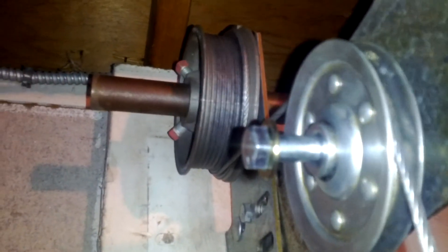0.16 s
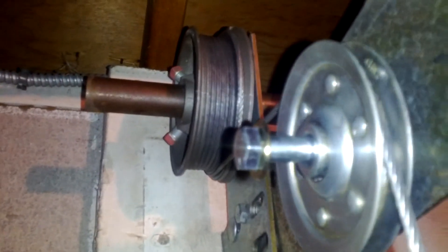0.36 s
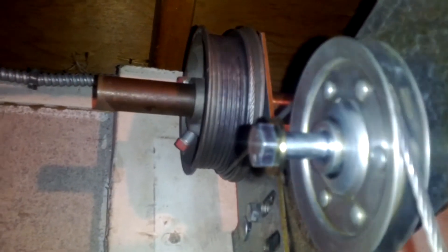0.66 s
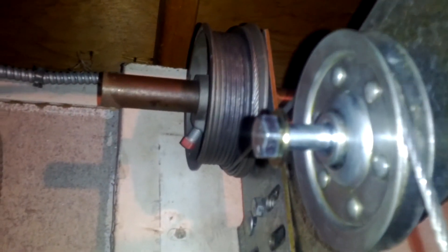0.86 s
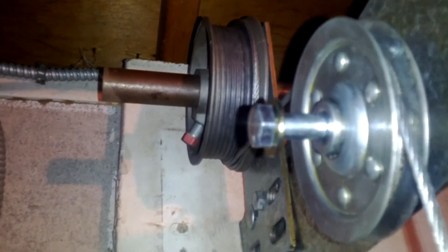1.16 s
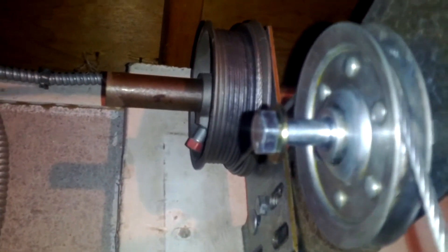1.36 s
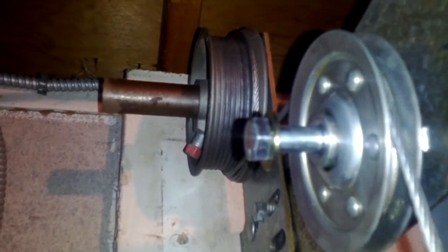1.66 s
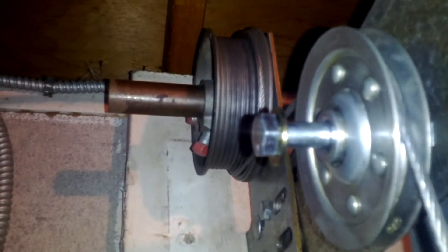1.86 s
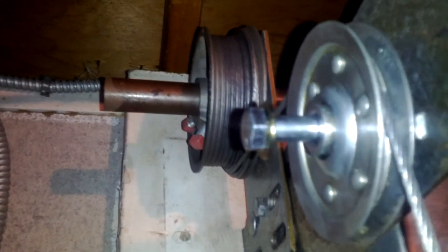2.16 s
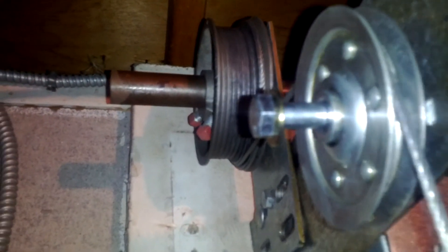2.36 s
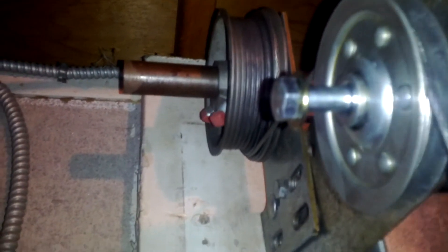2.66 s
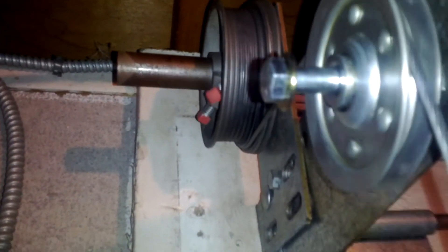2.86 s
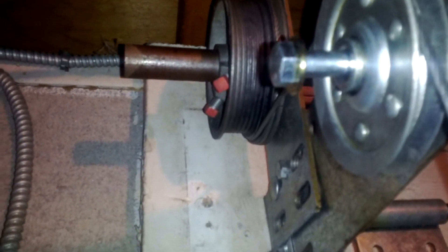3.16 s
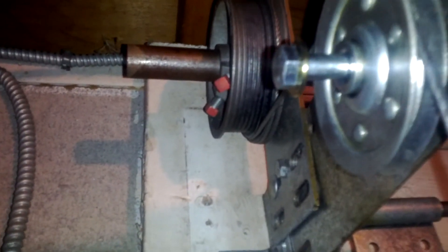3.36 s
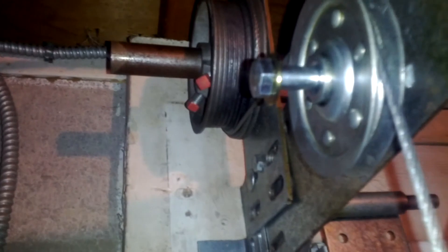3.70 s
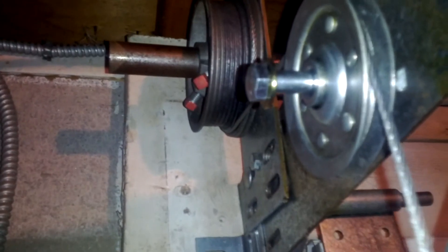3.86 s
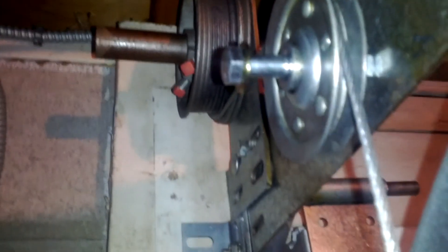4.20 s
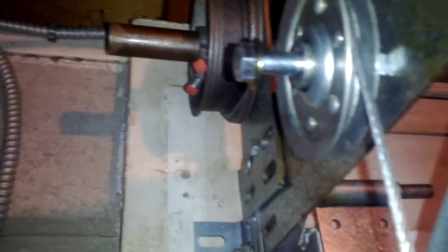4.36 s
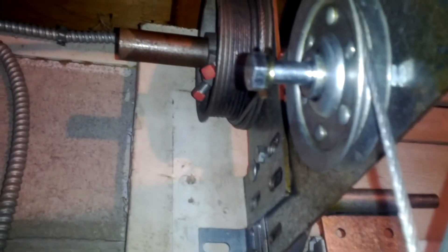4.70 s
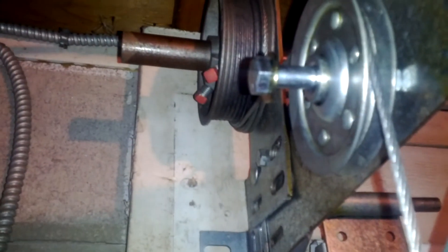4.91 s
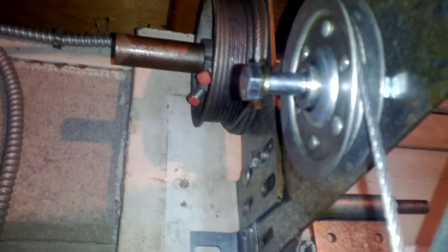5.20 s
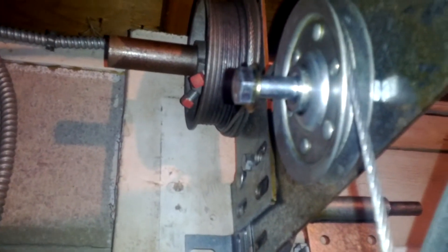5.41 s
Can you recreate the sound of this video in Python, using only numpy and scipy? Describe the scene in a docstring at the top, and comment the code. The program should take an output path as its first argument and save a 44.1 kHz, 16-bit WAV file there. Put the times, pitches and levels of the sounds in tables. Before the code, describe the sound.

Close up, a garage door rolls quietly with sharp spaced ticks, then knocks, shrieks and crashes with a metallic rattle, settling into scuffs and hiss.

```python
"""A sectional garage door rolls on its track, heard from close beside the cable drum and pulley.
Rollers, cable and panels rumble as coloured noise; the lift gear ticks nearby, ringing the pulley's modes.
Rollers knock in the track, steel gives one shrill ring, and the door crashes and rattles: struck modes
and noise that dies away in the garage, overloading the microphone. At the end the cable scuffs
over the drum and the slowing pulley rubs dryly, over the quiet air of the garage."""
import sys
import numpy as np
from scipy import signal
from scipy.fft import rfft, irfft
from scipy.io import wavfile

SR = 44100
rng = np.random.default_rng(int(sys.argv[2]) if len(sys.argv) > 2 else 0)


def to_wav(s):
    """Save 16-bit WAV."""
    ch = np.atleast_2d(s).T  # columns
    pcm = np.round(np.clip(ch, -1, 1) * 32767)  # PCM
    wavfile.write(sys.argv[1], SR, pcm.astype(np.int16))


N = 244314
T = np.arange(65536) / SR  # time within one hit [s]

# rollers knocking in the track:
# (time [s], relative ring level [dB], crack level [dB], treble tilt of the ring [dB/octave], rise [s])
KNOCK_HITS = [(2.094, -38, -42, -1, 0.0025), (2.146, -30.5, -55, -4.5, 0.006),
              (2.3463, -24, -38.5, -5.5, 0.0019), (2.3618, -12, -2, -1, 0.00044),
              (2.632, -31, -48, -2, 0.011), (2.8905, -20, -16.5, -2, 0.00067), (3.1, -24, -28, -1, 0.0005),
              (3.1225, -37.5, -26.5, -8, 0.00073)]
# blows on the door:
# (time [s], panel clatter level [dB], hardware jingle level [dB], panel boom level [dB], rise [s])
DOOR_BLOWS = [(2.696, -19, -20, -21.5, 0.0042), (2.905, -22, -17.5, -22.5, 0.0055),
              (2.94, -22.5, -15, -32, 0.0083), (2.961, -11, -3, -27.5, 0.0054)]
# colour of the swaying panels: (frequency [Hz], relative level [dB])
SWAY_COLOUR = [(10, -20.5), (40, 0), (65, -2.5), (110, -1.5), (150, -2), (210, -10.5), (265, -10.5),
               (350, -15.5), (700, -36), (3000, -64.5)]
# colour of the rollers in the track, and of faint air: (frequency [Hz], relative level [dB])
ROLL_COLOUR = [(30, -17), (150, 9), (350, -4), (560, 0), (1000, 0.5), (1600, -3.5), (2400, -13),
               (4000, -18.5), (6000, -14), (9000, -25.5), (16000, -37.5)]
# colour of the cable's hiss, and of the background hiss: (frequency [Hz], relative level [dB])
HISS_COLOUR = [(100, -1.5), (600, 0.5), (2000, -8.5), (4000, -8), (7500, -6), (9500, -3.5), (11500, 1),
               (13000, -3), (15500, -11.5)]
# colour of the door's heaving weight, and of the deepest rumble: (frequency [Hz], relative level [dB])
HEAVE_COLOUR = [(8, -9.5), (22, 3.5), (45, -0.5), (65, -1.5), (85, -15.5), (200, -38.5), (800, -80)]


def amp(db):
    """Decibels to gain."""
    return 10 ** (np.asarray(db) / 20)


def unit(x):
    """Scales to rms 1."""
    return x / np.sqrt(np.mean(x ** 2) + 1e-20)


def add(mix, s, sound):
    """Mixes a sound in at a time in seconds, cut off where the scene ends."""
    part = mix[round(s * SR):][:len(sound)]
    part += sound[:len(part)]


def read(points, hz):
    """Reads a table on a log-frequency axis."""
    f, value = np.transpose(points)
    return np.interp(np.log(hz + 1), np.log(f + 1), value)


def noise(hue, size, tilt_db=0):
    """Noise of a given colour and rms 1, tilted above 1 kHz in dB per octave."""
    hz = np.fft.rfftfreq(size, 1 / SR)
    octaves = np.log2(np.maximum(hz, 1000) / 1000)
    gain = amp(read(hue, hz) + tilt_db * octaves)
    return unit(irfft(rfft(rng.standard_normal(size)) * gain, size))


def fade(t60):
    """Exponential decay by 60 dB in t60 seconds."""
    return np.exp(-np.log(1000) * T / t60)


def onset(rise):
    """The straight build-up of a contact over its rise in seconds."""
    return np.minimum(T / max(rise, 1 / SR), 1)


def swell(start, rise, t60):
    """An envelope over the whole scene: builds from its start while already dying away."""
    age = np.maximum(np.arange(N) / SR - start, 0)
    return np.minimum(age / rise, 1) * np.exp(-np.log(1000) * age / t60)


def wander(size, per_s):
    """Random drift: normal draws at a rate per second, joined by straight lines."""
    t = np.arange(size) / SR
    return np.interp(t * per_s, np.arange(4096), rng.standard_normal(4096))


def ring(modes, tilt_db=0):
    """The clear modes of a struck part: decaying sines of random phase, tilted above 1 kHz."""
    total = np.zeros(len(T))
    for hz, db, t60 in modes:
        tilt = tilt_db * np.log2(max(hz / 1000, 1))
        total += amp(db + tilt) * fade(t60) * np.sin(2 * np.pi * (hz * T + rng.random()))
    return total


def cluster(bands):
    """Many close modes ringing together: steady noise of rms 1 gathered in a few bands."""
    hz = np.fft.rfftfreq(N, 1 / SR)
    gain = sum(amp(db) / (1 + (2 * (hz - centre) / width) ** 4) ** .5 for centre, width, db in bands)
    return unit(irfft(rfft(rng.standard_normal(N)) * gain, N))


def reverberate(x, stretch):
    """Lets each band of a dense sound die away as in the garage, its decay times scaled by stretch."""
    # decay of the garage: (frequency [Hz], t60 before stretching [s])
    garage_decay = [(60, 0.43), (300, .7), (700, 0.79), (1400, 0.59), (3000, 0.5), (5500, 0.47),
                    (8000, 0.28), (11000, 0.55), (15000, .19)]
    hz, spectrum = np.fft.rfftfreq(len(T), 1 / SR), rfft(x)
    centres, t60s = np.transpose(garage_decay)
    shares = [read(np.c_[centres, band], hz) for band in np.eye(len(centres))]
    return sum(irfft(spectrum * share) * fade(t60 * stretch) for share, t60 in zip(shares, t60s))


def quiet():
    """Steady background of the garage: coloured noises for faint air, hiss and low rumble."""
    layers = ((ROLL_COLOUR, -71), (HISS_COLOUR, -64), (SWAY_COLOUR, -59), (HEAVE_COLOUR, -59.5))  # dB
    return sum(amp(db) * noise(hue, N) for hue, db in layers)


def rolling():
    """One effort drives the rollers in the track, the cable's hiss over the pulley and the panels' rumble."""
    # how hard the door rolls: (time [s], level [dB])
    effort_points = [(0.0, -60), (0.25, -60), (0.78, -53), (0.91, -60.5), (1.2, -59.5), (2.05, -53)]
    coast_db_per_s = 15  # after the last point the door runs down
    t = np.arange(N) / SR
    s, level_db = np.transpose(effort_points)
    coast_db = coast_db_per_s * np.maximum(t - s[-1], 0)
    effort = amp(np.interp(t, s, level_db) - coast_db)
    # each layer in dB relative to the effort
    rollers = noise(ROLL_COLOUR, N) * amp(2.5 + .8 * wander(N, per_s=20))
    cable = noise(HISS_COLOUR, N) * amp(-1 + .6 * wander(N, per_s=390))
    panels = noise(SWAY_COLOUR, N) * amp(-3.5)
    return effort * (rollers + cable + panels)


def bump(db, hz, width, t60):
    """A roller rides over a rough spot and a panel hums briefly in a narrow band of modes."""
    hum = cluster([(hz, width, 0)])[:len(T)] * fade(t60)
    steady_hum = unit(hum) * np.sqrt(np.mean(fade(t60) ** 2))  # same energy at every draw
    return amp(db) * onset(2.3 / hz) * steady_hum


def tick(db):
    """A dry snap rings the pulley, glances off the nearby header, and faintly returns from the walls."""
    # colour of the dry snap: (frequency [Hz], relative level [dB])
    snap_colour = [(200, -34), (1200, -11.5), (2000, -25.5), (2600, -8), (4200, -23), (5300, -11),
                   (5900, -4.5), (8300, -1.5), (10500, 1), (11700, -2.5), (12800, -8), (15500, -14.5)]
    # colour of the reflections: (frequency [Hz], relative level [dB])
    tick_colour = [(200, -18), (550, -10.5), (2000, -15.5), (2500, -8.5), (3600, -2.5), (5000, -8.5),
                   (6000, -0.5), (7000, 4.5), (8500, -1.5), (10300, 2.5), (12300, -4), (15500, -14)]
    # modes of the pulley: (frequency [Hz], relative level [dB], t60 [s])
    pulley_modes = [(2450, -24, .06), (3480, -29, .06), (3790, -32, .04), (5760, -10, .016),
                    (6500, -12, .018), (6970, -12, .032), (8100, -15, .022), (9450, -12, .018),
                    (10500, -4, .012), (10830, -11, .02), (11500, -8, .009), (12120, -18, .035),
                    (14720, -15, .016)]
    snap = noise(snap_colour, len(T)) * fade(0.011)
    header = noise(tick_colour, len(T)) * fade(0.04) * onset(0.011)
    walls = reverberate(noise(tick_colour, len(T), tilt_db=-2.5), stretch=0.46) * onset(0.0037)
    layers = amp(-0.5) * snap + amp(2) * ring(pulley_modes) + amp(-7.5) * header + amp(-23.5) * walls
    return amp(db) * onset(0.000099) * layers


def clink(db, rise):
    """A loose bracket is nudged: its clustered modes ring into the room."""
    # modes of a bracket: (centre [Hz], width [Hz], relative level [dB])
    bracket_bands = [(1240, 100, -5.5), (1490, 110, 2.5), (1726, 40, 1.5), (5357, 220, -11.5),
                     (7000, 330, -14)]
    return amp(db) * onset(rise) * reverberate(cluster(bracket_bands)[:len(T)], stretch=0.55)


def knock(ring_db, crack_db, tilt_db, rise):
    """A roller strikes the track: a short crack, then the steel and the room ring on."""
    # colour of the crack: (frequency [Hz], relative level [dB])
    crack_colour = [(150, -38), (380, -24), (550, -13), (1400, -13), (2200, -13), (4400, -10), (5000, 9),
                    (5600, -10), (6300, -0.5), (7600, -18), (10200, -6), (11450, 4), (12400, -14),
                    (15000, -24)]
    # colour of the track's dense ringing: (frequency [Hz], relative level [dB])
    track_colour = [(60, -25), (200, -8), (420, -19.5), (640, -3), (950, -3.5), (1200, -5), (1450, 1),
                    (2100, -12), (3300, -13.5), (4100, -16), (5050, -15.5), (5700, -15), (6350, -14),
                    (7200, -23), (9800, -19.5), (11500, -17), (14000, -29)]
    # clear modes of the track: (frequency [Hz], relative level [dB], t60 [s])
    track_modes = [(668, -14, .6), (884, -14, .55), (957, -14, .6), (1412, -1, .26), (1470, -9, .35),
                   (1675, -15, .45), (2428, -17, .26), (3386, -17, .24), (4800, -8, .13), (5006, -4, .16),
                   (5792, -14, .16), (6401, -13, .2), (11330, -2, .06), (11520, -2, .07)]
    crack = noise(crack_colour, len(T)) * fade(.045)
    dense = reverberate(noise(track_colour, len(T), tilt_db), stretch=0.87)
    steel = dense + ring(track_modes, tilt_db)
    return onset(rise) * (amp(crack_db) * crack + amp(ring_db - 3.5) * steel)


def shaking():
    """Knocks and blows pile energy into the door: its panels sway and its whole weight heaves, then settle."""
    # a knock passes on only half of its ring level in dB, and 30 dB less
    jolts = [(s, -30 + 0.5 * ring_db) for s, ring_db, *_ in KNOCK_HITS]
    jolts += [(s, boom_db) for s, _, _, boom_db, _ in DOOR_BLOWS]

    def piled(rise, t60):
        """Adds the energies of all jolts, each a swell of its own."""
        return np.sqrt(sum((amp(db) * swell(s, rise, t60)) ** 2 for s, db in jolts))

    sway = piled(rise=.1, t60=1.115)  # the panels answer quickly
    heave = piled(rise=0.27, t60=2)  # the whole weight is slow and lingers
    return amp(2.5) * sway * noise(SWAY_COLOUR, N) + amp(-4.5) * heave * noise(HEAVE_COLOUR, N)


def shriek():
    """Steel slips on steel: the squeal grows fast and leaves a tight cluster of high modes beating."""
    # modes of the shrill steel: (frequency [Hz], relative level [dB], t60 [s])
    shrill_modes = [(8037, -12, .2), (8260, -14, .22), (8393, 0, .25), (8461, -2, .22), (8702, -14, .2),
                    (8811, -13, .2), (8889, -11, .21), (9024, -14, .2), (9374, -13, .17), (9863, -18, .22),
                    (10130, -16, .21)]
    # colour of the dense squeal: (frequency [Hz], relative level [dB])
    shrill_colour = [(3000, -53.5), (7000, -27.5), (7900, -12), (8400, 2), (9000, -7.5), (10100, -16.5),
                     (11000, -22.5), (16000, -35.5)]
    growth = amp(-34 * (1 - onset(.009)))  # climbs 34 dB in 9 ms
    dense = noise(shrill_colour, len(T)) * fade(0.33)
    flutter = amp(2 * wander(len(T), per_s=298))
    return growth * flutter * (amp(-3.5) * ring(shrill_modes) + amp(-3.0) * dense)


def blow(panel_db, jingle_db, boom_db, rise):
    """The door jolts: panels clatter and boom while loose hinges chatter."""
    # colour of the panel clatter: (frequency [Hz], relative level [dB])
    panel_colour = [(100, -17), (300, -4.5), (430, -3), (520, 1), (750, -5), (900, 0.5), (1080, 0),
                    (1300, 0), (1900, -4), (2300, -6.5), (3500, -10.5), (6000, -13), (8000, -9.5),
                    (16000, -26.5)]
    # colour of the jingling hardware: (frequency [Hz], relative level [dB])
    jingle_colour = [(1000, -30.5), (5000, -11), (8500, -19.5), (10000, -6), (10800, -2), (11300, 1),
                     (12200, -12), (13200, -8.5), (14000, -15), (16000, -19.5)]
    # colour of the panel boom: (frequency [Hz], relative level [dB])
    boom_colour = [(20, -11), (50, -4), (85, -2.5), (110, 4), (150, -4), (205, -10), (262, 2.5),
                   (315, -16.5), (700, -37.5), (3000, -74)]
    chatter = amp(1.5 * wander(len(T), per_s=260))
    panels = amp(panel_db) * reverberate(noise(panel_colour, len(T)), stretch=0.88)
    hinges = amp(jingle_db) * noise(jingle_colour, len(T)) * fade(0.24)
    boom = amp(boom_db) * reverberate(noise(boom_colour, len(T)), stretch=0.55) * onset(0.0052)
    return onset(rise) * (chatter * (panels + hinges) + boom)


def ping(db, t60):
    """A hinge pin snaps in its sleeve: its clustered modes start sharply and decay."""
    # modes of a hinge pin: (centre [Hz], width [Hz], relative level [dB])
    pin_bands = [(3580, 790, 4), (4100, 200, -6), (4670, 190, -10), (6300, 250, -7.5)]
    return amp(db) * onset(0.0012) * cluster(pin_bands)[:len(T)] * fade(t60)


def scuffs():
    """The cable drags over the drum: a soft swell of grainy hiss and a hollow scrape that lingers."""
    # cable scuffs: (time of the height [s], hiss level [dB], time scale of the swell [s], scrape level [dB])
    scuff_swells = [(3.673, -45.5, 0.036, -49.5), (3.963, -48, 0.0058, -59), (3.999, -50, 0.039, -63)]
    # colour of the scuffing hiss: (frequency [Hz], relative level [dB])
    scuff_colour = [(300, 8.5), (1500, 0), (5000, -0.5), (7500, -1), (11000, 7.5), (13000, 2),
                    (15500, -4.5)]
    # resonances of the drum under the cable: (centre [Hz], width [Hz], relative level [dB])
    drum_bands = [(575, 59, -5.5), (930, 330, -23), (1246, 370, -17), (2320, 3100, -28)]
    t, out = np.arange(N) / SR, np.zeros(N)
    for s, db, half, scrape_db in scuff_swells:
        distance = np.hypot((t - s) / half, 1) - 1  # a rounded top with exponential flanks
        grain = amp(1.09 * wander(N, per_s=550))
        out += amp(db) * noise(scuff_colour, N) * np.exp(-1.5 * distance) * grain
        out += amp(scrape_db) * cluster(drum_bands) * np.exp(-.8 * distance)
    return out


def bearing():
    """The slowing pulley rubs dryly on its bolt while the cable hisses over it: both swell, then die away."""
    # resonances of the dry rub: (centre [Hz], width [Hz], relative level [dB])
    rub_bands = [(1790, 120, 0), (2300, 400, -11)]
    start, rise = 4.03, .2  # s
    rub = cluster(rub_bands) * amp(-62.5 + 2.0 * wander(N, per_s=33)) * swell(start, rise, t60=2.0)
    hiss = noise(HISS_COLOUR, N) * amp(-60) * swell(start, rise, t60=4.35)
    return rub + hiss


def scene():
    """All parts of the door at their moments."""
    # soft bumps of the rollers: (time [s], level [dB], frequency [Hz], width [Hz], t60 [s])
    roller_bumps = [(0.037, -45, 156.6, 25, 0.29), (0.407, -38, 163, 25, 0.081),
                    (1.14, -50.5, 167, 30, 0.25), (1.356, -39, 165.5, 30, 0.085),
                    (1.82, -57, 170, 40, 0.24), (3.939, -32, 260, 400, 0.022)]
    # ticks of the lift gear: (time [s], level [dB])
    gear_ticks = [(.2686, -13), (.8116, -12), (0.869, -34.5), (1.6993, -12), (2.5919, -13), (2.8898, -12),
                  (3.1002, -18)]
    # loose brackets clinking: (time [s], level [dB], rise [s])
    bracket_clinks = [(2.093, -33, 0.0053), (2.126, -40, 0.004), (3.101, -24.5, 0.0026)]
    # hinge pins pinging: (time [s], level [dB], t60 [s])
    pin_pings = [(3.0, -25, .26), (3.1225, -24.5, .06)]
    mix = quiet() + rolling() + shaking() + scuffs() + bearing()
    hits = ((bump, roller_bumps), (tick, gear_ticks), (clink, bracket_clinks),
            (knock, KNOCK_HITS), (blow, DOOR_BLOWS), (ping, pin_pings))
    for source, table in hits:
        for s, *settings in table:
            add(mix, s, source(*settings))
    add(mix, 2.692, shriek())
    return mix[None]


def record(dry):
    """The loudest hits overload the microphone input a little unevenly and their overtones fold back."""
    input_rate = 32000  # Hz; overtones above half of this fold back
    ceiling = .93
    sampled = signal.resample_poly(dry, input_rate, SR, axis=1, window=("kaiser", 4))
    clipped = sampled / (1 + (sampled / ceiling) ** 6) ** (1 / 6)
    lopsided = clipped + 0.056 * np.diff(clipped ** 2, prepend=0)  # adds even overtones
    restored = signal.resample(lopsided, round(lopsided.shape[1] * SR / input_rate), axis=1)[:, :N]
    band_limit = signal.firwin(511, 15900, window=("kaiser", 8), fs=SR)  # low-pass, edge in Hz
    return signal.oaconvolve(restored, band_limit[None], "same")


dry = scene()
out = record(dry)
to_wav(out)
```